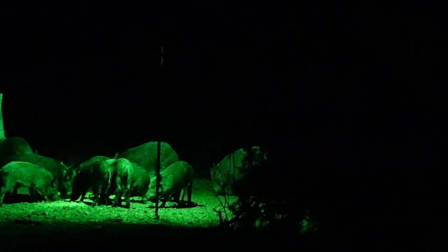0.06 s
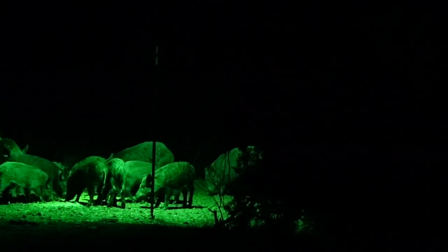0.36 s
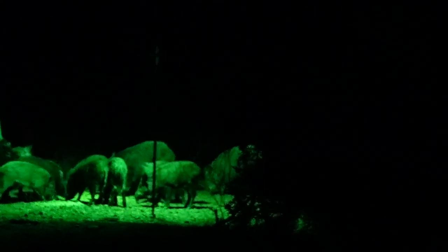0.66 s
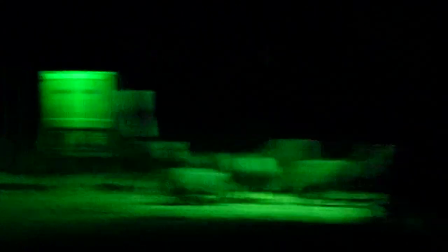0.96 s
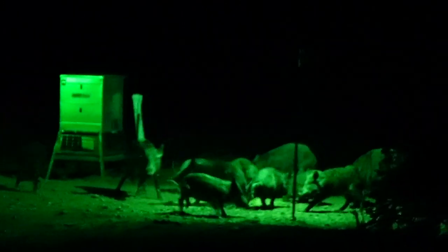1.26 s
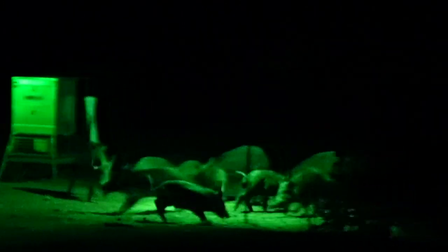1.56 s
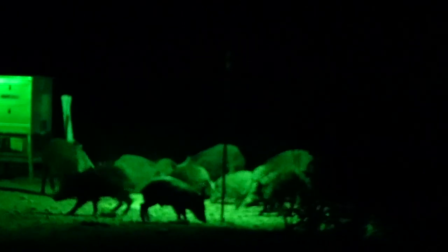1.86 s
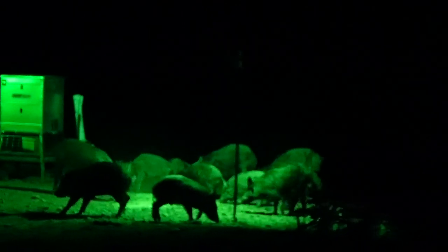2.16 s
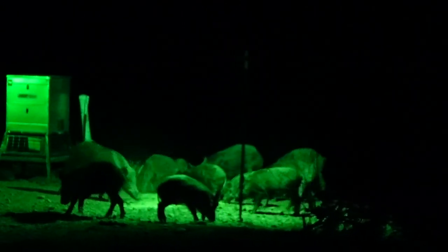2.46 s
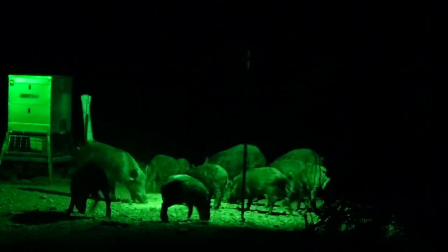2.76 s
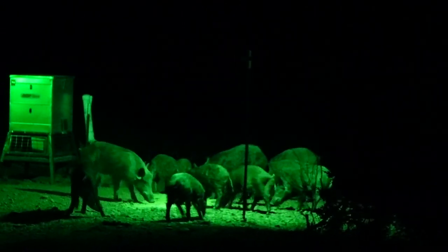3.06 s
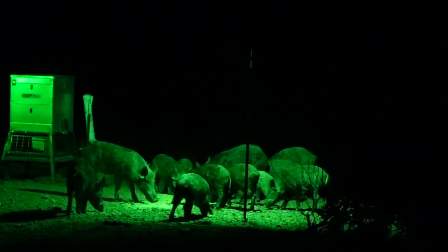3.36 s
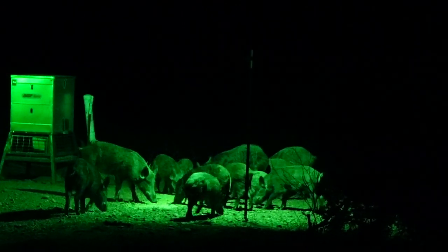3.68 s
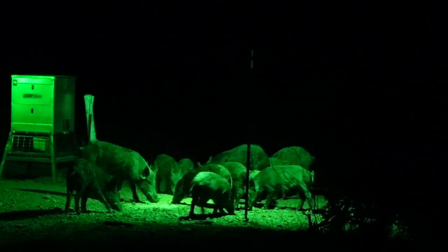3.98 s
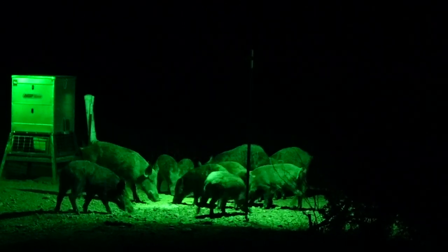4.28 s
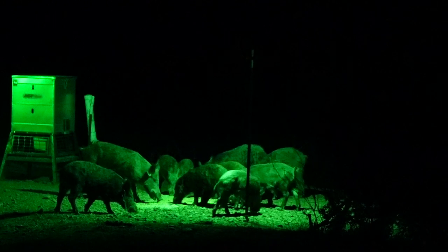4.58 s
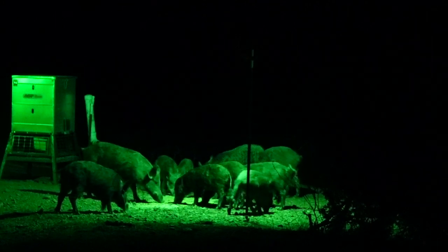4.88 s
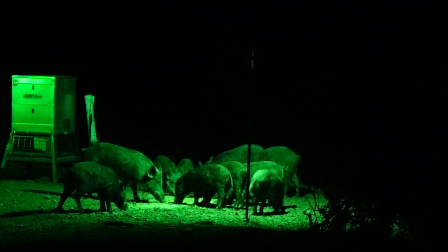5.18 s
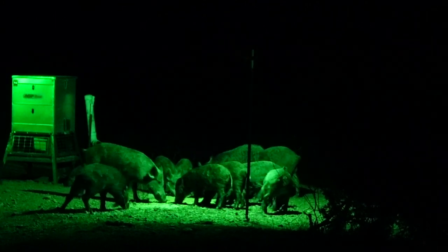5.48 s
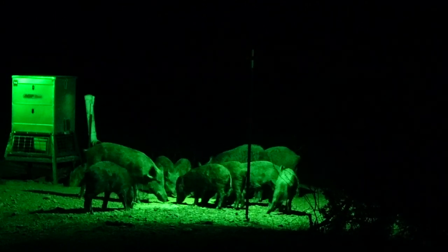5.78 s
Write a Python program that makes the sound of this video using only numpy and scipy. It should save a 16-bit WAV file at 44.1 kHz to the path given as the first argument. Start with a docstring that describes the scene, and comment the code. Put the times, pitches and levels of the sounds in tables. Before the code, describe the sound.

In a clearing at night, wild hogs chew and shuffle over dry ground. One soon lets out a short, strained, raspy squeal that collapses into a grunt, by far the loudest sound. A flurry of crisp snaps and hoof knocks follows, with rubbing cloth and dull thuds on the hand-held microphone. The herd settles into soft crunching, snout scrapes and occasional grunts, while a small bird chirps faintly far away.

```python
"""Feral hogs feeding at night

One hog squeals in quick, harsh pushes, a strained whistle over rattling vocal folds, and ends on a
gruff bark. Jaws crack and smack, snouts root in dry ground, others grunt softly and a far bird chirps.
A hand-held camera swings during the squeal: cloth rustles and the microphone rumbles."""
import sys
import numpy as np
from scipy import signal
from scipy.fft import rfft, irfft
from scipy.io import wavfile
from scipy.ndimage import uniform_filter1d

SR = 44100
rng = np.random.default_rng(int(sys.argv[2]) if len(sys.argv) > 2 else 0)


def dump(signal):
    """Clip the signal to [-1, 1] and save it as 16-bit WAV at the path in sys.argv[1]."""
    limited = np.clip(np.atleast_2d(signal).T, -1, 1)
    pcm = np.round(limited * 32767).astype(np.int16)
    wavfile.write(sys.argv[1], SR, pcm)


N = 257103
TIME = np.arange(N) / SR

# EQ of dry fibres, for both snaps and cloth: f/Hz, level/dB
FIBRE_EQ = [(50, -30), (200, -3), (1000, -6.5), (2000, 2.5), (4000, 1.5), (5500, -1), (6800, -4.5),
            (8400, 1.5), (9700, -11.5), (11000, -11), (13000, -8), (16000, -15.5)]


def squeal():
    """A strained whistle over chaotic fold pulses, which ring the mouth, snout and upper throat."""
    # upper throat resonances that carry the rasp: f/Hz, width/Hz, level/dB
    rasp_formants = [(3085, 140, -5.5), (3780, 300, 3), (4550, 240, -1.5), (5100, 700, -3.8),
                     (5730, 670, -11.5), (7700, 1100, -9.5)]
    moan_top_hz, moan_hz_per_db = 474, 7  # the moan sinks as it weakens
    effort, snout_level, rasp_level, whistle_hz, mouth_hz, rough = pushes()
    snout_db = 20 * np.log10(snout_level / snout_level.max())
    snout_hz = np.maximum(moan_top_hz + moan_hz_per_db * snout_db, moan_top_hz / 2)
    rough = np.clip(rough, .05, .98)
    drive = folds(np.full(N, 255.), jitter=.2, rough=0.87 * rough)
    # the rattling folds shake the whistle in pitch and strength
    shaken_hz = whistle_hz * (1 + 0.0705 * rough * wander(306))
    whistle = unit(sine(shaken_hz) * amp(3.8 * wander(260)))
    mouth = unit(narrow(drive, mouth_hz, 390))
    mouth += amp(-1.5) * unit(narrow(drive, (whistle_hz + mouth_hz) / 2, 1600))
    mouth += amp(-11) * unit(narrow(drive, 1180, 440))  # back of the throat
    # slack folds let broad breath through between the pushes
    puffs = folds(np.full(N, 130.), jitter=0.27, rough=1.0)
    breath = amp(7) * rough ** 4 * unit(resonate(puffs, 1240, 2130))
    voice = steadied(crossfade(whistle, steadied(mouth), rough) + breath)
    # the slow mode of the folds moans in the snout
    moan = sine(snout_hz * (1 + .07 * wander(123.4)))
    snout = steadied(unit(narrow(drive, snout_hz, 250)) + moan)
    # the throat walls flap, so each resonance flutters on its own
    throat = np.zeros(N)
    for hz, width, db in rasp_formants:
        flutter = amp(db + 3.5 * wander(70))
        throat += flutter * unit(resonate(drive, hz * (1 + .022 * wander(35)), width))
    rasp = steadied(unit(throat) + amp(-6.5) * sine(2 * shaken_hz))
    return effort * voice + snout_level * snout + rasp_level * rasp


def pushes():
    """Control curves of the squeal: the pushes add up in power and the strongest leads the voice."""
    # hoarse huffs to strained whistles: t at full force/s, attack/s, hold/s, level/dB, whistle f/Hz,
    # scoop from below/Hz, mouth f/Hz, roughness/0-1, snout level/dB, rasp level/dB
    push_cues = [(0.791, 0.026, 0.009, -30, 1230, 30, 900, 0.92, -38, -52),
                 (0.811, 0.012, 0.001, -22.8, 1185, 20, 1370, 0.06, -41, -29),
                 (0.864, 0.030, 0.005, -16.3, 2040, 490, 1700, 0.46, -32, -37),
                 (0.900, 0.020, 0.004, -28.5, 2040, 20, 1270, 0.88, -36, -33),
                 (0.951, 0.056, 0.013, -12.5, 1865, 25, 1610, 0.35, -34, -40),
                 (0.985, 0.024, 0.020, -15, 1905, 40, 2130, 0.43, -25.5, -28.5),
                 (1.111, 0.044, 0.029, -10.2, 1850, 285, 2240, 0.32, -37.5, -25.5)]
    scoop_lead_s, scoop_s, sag_hz_per_s = 0.01, 0.0045, 1900
    mouth_octaves_per_db, slack_rough = 0.011, 0.93
    columns = np.transpose(push_cues)[:, :, None]
    s, attack, hold, db, top_hz, scoop_hz, open_hz, top_rough, snout_db, rasp_db = columns
    force = swell(s, attack, hold)
    # the whistle leaps up just before full force and sags after it
    scoop = (1 - np.tanh((TIME - s + scoop_lead_s) / (2 * scoop_s))) / 2
    whistle_hz = top_hz - scoop_hz * scoop - np.clip(sag_hz_per_s * (TIME - s), 0, top_hz / 2)
    # as the force eases, the mouth closes and the slack folds rattle more
    mouth_hz = open_hz * 2 ** (mouth_octaves_per_db * force)
    rough = slack_rough + (top_rough - slack_rough) * amp(0.3 * force)
    voice, snout, rasp = amp(db + force), amp(snout_db + 0.72 * force), amp(rasp_db + 0.8 * force)
    levels = [np.linalg.norm(gain, axis=0) for gain in (voice, snout, rasp)]
    timbre = [np.average(each, axis=0, weights=voice ** 2) for each in (whistle_hz, mouth_hz, rough)]
    return levels + timbre


def swell(s, attack, hold):
    """The force of a push in dB re its top: a rounded rise, a hold, a quick drop and a tail."""
    drop_db, drop_s, tail_db_per_s = 7, 0.004, 380
    before, after = np.maximum(s - TIME, 0), np.maximum(TIME - s - hold, 0)
    release_db = drop_db * (1 - np.exp(-after / drop_s)) + tail_db_per_s * after
    return np.maximum(-20 * (before / attack) ** 2 - release_db, -300)


def folds(hz, jitter, rough):
    """Uneven slaps of the vocal folds, each followed by a puff of turbulence."""
    size = len(hz)
    turns = np.cumsum(hz * np.exp(jitter * wander(300, size))) / SR
    slaps = np.diff(np.floor(turns), prepend=0) * amp(1.9 * wander(200, size))
    puffs = (.2 + np.exp(-(turns % 1) / 0.49)) * rng.standard_normal(size)
    return crossfade(unit(slaps), unit(puffs), rough)


def bark():
    """A last push: the whistle collapses into a ragged grunt through the half-closed snout."""
    # the push: t at full force/s, attack/s, hold/s, level/dB, whistle f/Hz, roughness/0-1
    bark_cue = (1.287, 0.019, 0.011, -24.8, 1300, 0.64)
    # throat resonances: f/Hz, width/Hz, level/dB
    formants = [(355, 110, 0), (820, 200, -1.5), (1330, 340, -3), (1600, 250, 0), (2454, 240, -2.5),
                (3200, 640, -5.5), (4150, 410, -9), (5030, 520, -6), (6500, 2300, -11)]
    s, attack, hold, db, hz, rough = bark_cue
    drive = folds(np.full(N, 170.), jitter=0.27, rough=0.85)
    throat = sum(amp(level) * unit(resonate(drive, f, width)) for f, width, level in formants)
    whistle = unit(sine(hz * (1 + 0.032 * wander(240))) * amp(3.6 * wander(200)))
    force = swell(s, attack, hold) * np.where(TIME > s, 0.76, 1)  # slower release than the squeal
    return amp(db + force) * crossfade(whistle, steadied(throat, size=350), rough)


def knocks():
    """Each bite or step is a sharp crack that rings briefly and crumbles away."""
    # jaw cracks and hoof knocks: t/s, peak level/dB, ring f/Hz
    hits = [(0.063, -30, 2770), (0.179, -23.5, 820), (0.201, -24.5, 980), (0.627, -21.5, 620),
            (2.1495, -20.5, 710), (2.726, -32, 2220), (2.7568, -21.5, 2130), (2.7705, -25.5, 2200),
            (2.7795, -31, 2240), (2.934, -30, 2000), (4.677, -29.5, 860), (4.68, -34, 1600),
            (4.849, -30.5, 1288), (4.888, -31, 1880), (5.589, -30.5, 1430)]
    ring_t60_s = 0.025
    out, t = np.zeros(N), np.arange(4096) / SR
    for s, db, hz in hits:
        crumble = 0.055 * rng.standard_normal(len(t)) * amp(-60 * t / (1.45 * ring_t60_s))
        crack = resonate((t == 0) + crumble, hz, 810)
        ring = np.sin(2 * np.pi * hz * t) * amp(-60 * t / ring_t60_s) * (1 - np.exp(-t * hz))
        sound = crack / abs(crack).max() + 0.4 * ring
        add(out, s, amp(db) * sound / abs(sound).max())
    return out


def snaps():
    """Dry fibres strain and give way: a tick inside a short crunch, each with its own ring."""
    # snaps and scuffs: t/s, peak level/dB, time to fall 30 dB/s, tilt/(dB per octave)
    hits = [(0.065, -30.5, .06, 0), (0.252, -26.5, .005, -4.5), (0.313, -31.5, .018, -2),
            (0.344, -32, .008, 2), (1.380, -26, .006, 6), (1.457, -26.5, .01, 0), (1.548, -25, .07, 1),
            (1.616, -26.5, .06, 6), (1.662, -24, .06, -4.5), (1.735, -26, .008, -4.5), (1.785, -22, .04, 0),
            (1.912, -27.5, .007, -5), (1.918, -27, .014, 2), (1.973, -26.5, .04, -0.5),
            (2.164, -22.5, .016, -3), (2.2, -24, .007, -1.5), (2.209, -29.5, .03, -2),
            (2.231, -29, .004, -5), (2.289, -32, .01, -3), (2.510, -29, .012, -6), (2.524, -29, .03, -4.5),
            (2.850, -31.5, .009, 6), (3.193, -30, .012, -4), (4.227, -29.5, .04, 1), (4.289, -25, .008, 0),
            (4.849, -32.5, .012, 4)]
    # smaller snaps from the hooves of the startled hogs
    start_s, end_s, grit_per_s = 1.35, 2.45, 22
    chances = rng.random((round((end_s - start_s) * grit_per_s), 2))
    grit = [(start_s + (k + late) / grit_per_s, -35.5 + 5 * (size - .5), 0.016, -4)
            for k, (late, size) in enumerate(chances)]
    out, t = np.zeros(N), np.arange(-512, 7680) / SR
    strain, tick = 0.26 * np.exp(-abs(t) / 0.0017), 0.96 * np.exp(-abs(t) / 0.00078)
    for s, db, length, tilt_db in hits + grit:
        burst = rng.standard_normal(len(t)) * amp(3 * rng.standard_normal(len(t)))
        envelope = np.where(t < 0, strain, amp(-30 * abs(t) / length) + tick)
        ring_eq = np.column_stack([np.geomspace(800, 16000, 14), 2.5 * rng.standard_normal(14)])
        sound = colour(colour(burst * envelope, FIBRE_EQ, tilt_db), ring_eq)
        add(out, s + t[0], amp(db) * sound / abs(sound).max())
    return out


def grunts():
    """Slow, ragged fold pulses in a long snout, with breath through the nostrils."""
    # low grunts and snorts: t/s, length/s, level/dB, throat f/Hz, breath re throat/dB
    grunt_cues = [(0.565, 0.11, -38, 620, -3.5), (3.21, 0.051, -46.5, 353, -1.5),
                  (3.476, 0.03, -44.5, 420, -18.5), (3.982, 0.054, -48, 370, -14),
                  (4.19, 0.26, -49, 497, -9), (4.565, 0.11, -48, 256, -5.5),
                  (5.003, 0.062, -48.5, 473, -0.5), (5.63, 0.14, -48, 830, -12)]
    out = np.zeros(N)
    for s, length, db, hz, breath_db in grunt_cues:
        size = int(length * SR)
        drive = folds(np.full(size, 75.), jitter=0.13, rough=1.0)
        throat = unit(resonate(drive, hz, width=hz * (0.51 + 1.2 * amp(breath_db))))
        breath = amp(breath_db) * unit(resonate(drive, 1730, 1500))
        add(out, s, amp(db) * unit(throat + breath) * np.hanning(size) ** 0.62)
    return out


def rooting():
    """A snout shoves loose dirt: a short, grainy scrape."""
    # shoves: t/s, length/s, level/dB, centre f/Hz
    scrapes = [(0.44, 0.034, -52.5, 1680), (2.56, 0.09, -47.5, 1970), (2.951, 0.076, -45.5, 1950),
               (3.1, 0.1, -55, 2190), (3.45, 0.05, -46.5, 1380), (3.621, 0.086, -48.5, 1650),
               (4.572, 0.048, -50, 2100), (5.58, 0.14, -49, 1470)]
    out = np.zeros(N)
    for s, length, db, hz in scrapes:
        size = int(length * SR)
        grit = rng.standard_normal(size) * amp(5 * wander(130, size))
        add(out, s, amp(db) * unit(resonate(grit, hz, 1160)) * np.hanning(size) ** 0.97)
    return out


def herd():
    """A bed of many snouts and hooves: a soft wash, little smacks and crisp straw."""
    # how busily the herd shuffles: t/s, level/dB
    activity = [(0.0, -49.7), (0.5, -53.3), (1.5, -46.5), (1.85, -52), (2.47, -52.3), (2.55, -50.3),
                (3.1, -50.2), (3.45, -51), (3.95, -49.4), (4.32, -46.3), (4.7, -49.7), (5.83, -49.7)]
    # EQ of the shuffling: f/Hz, level/dB
    wash_eq = [(40, -4.5), (120, -3), (250, -1), (450, -0.5), (900, -1.5), (1400, -0.5), (2200, -7),
               (3200, -12), (6000, -25.5), (16000, -36)]
    # EQ of the straw: f/Hz, level/dB
    straw_eq = [(500, -29), (2000, -6.5), (3500, -0.3), (5000, -1.9), (6800, -3), (8500, -2.8), (9800, -8),
                (13000, -10.3), (16000, -14.5)]
    busy_db = curve(activity)
    wash = unit(colour(rng.standard_normal(N), wash_eq))
    smacks = patter(per_s=14, pitches_hz=np.geomspace(380, 2400, 8), width_share=0.37)
    shuffle = amp(busy_db) * (amp(-0.5) * wash + amp(-5.3) * smacks)
    hiss = rng.standard_normal(N)
    ticks = patter(per_s=30, pitches_hz=np.geomspace(2600, 12000, 5), width_share=0.56)
    stalks = hiss + 0.38 * ticks * amp(3.2 * wander(38))
    straw_db = -53.3 + 1.35 * (busy_db - np.median(busy_db))
    straw = unit(colour(stalks, straw_eq)) * amp(straw_db) * np.interp(TIME, [2.1, 2.5], [.3, 1])
    return (shuffle + straw) * amp(0.8 * wander(24))  # the feeding comes in uneven clumps


def patter(per_s, pitches_hz, width_share):
    """Small ticks that ring briefly, about per_s a second at each pitch."""
    out = np.zeros(N)
    for hz in pitches_hz:
        ticks = (rng.random(N) < per_s / SR) * rng.uniform(-1.24, 1, N)
        out += unit(resonate(ticks, hz, width_share * hz))
    return unit(out)


def bumps():
    """Fingers thud dully on the camera."""
    # soft bumps on its body: t/s, level/dB, ring f/Hz, t60/s
    thuds = [(0.36, -30.5, 45.4, 0.27), (0.41, -37, 168, 0.12), (0.727, -25.5, 59.6, 0.15),
             (0.732, -24.5, 156, .07), (2.15, -32, 160, 0.116), (2.149, -25, 400, 0.05),
             (2.321, -32, 163.3, .12), (2.325, -35.5, 68, 0.27)]
    out, t = np.zeros(N), np.arange(SR // 3) / SR
    attack = 1 - np.exp(-t / 0.0062)
    for s, db, hz, t60 in thuds:
        add(out, s, amp(db - 60 * t / t60) * np.sin(2 * np.pi * hz * t) * attack)
    return out


def handling():
    """Cloth rubs in clumps of tiny slips while the camera swings; its body rumbles, then settles."""
    # cloth rubbing, ahead of its fade-out: t/s, level/dB
    rubbing = [(0.0, -50.5), (0.55, -56.5), (0.93, -41.5), (1.68, -47.5), (1.92, -55), (2.4, -51),
               (2.5, -63.5)]
    # EQ of the body's rumble: f/Hz, level/dB
    rumble_eq = [(3, -45.5), (12, 5.5), (24, -9.5), (38, -11.5), (70, -22), (110, -29.5), (200, -29.5),
                 (500, -81.5)]
    swing_db, rest_db, swing_end_s, settle_db_per_s = -40.3, -70, 2.33, 36
    slips = (rng.standard_normal(N) + 1.1 * crackle(per_s=1300, spread_db=3.4)) * amp(2.6 * wander(55))
    cloth = unit(colour(slips, FIBRE_EQ)) * amp(curve(rubbing)) * np.interp(TIME, [2.0, 2.6], [1, 0])
    rumble_db = np.maximum(swing_db - settle_db_per_s * np.maximum(TIME - swing_end_s, 0), rest_db)
    return cloth + unit(colour(rng.standard_normal(N), rumble_eq)) * amp(rumble_db)


def crackle(per_s, spread_db):
    """Sparse clicks, mostly small and a few large."""
    clicks = (rng.random(N) < per_s / SR) * rng.standard_normal(N)
    return unit(clicks * amp(spread_db * np.minimum(rng.exponential(1, N), 3.5)))


def chirps():
    """A small far bird: short runs of a thin, falling note, never quite at the same pitch."""
    # phrases: t/s, notes, note spacing/s, level/dB
    phrases = [(3.2, 2, 0.058, -53), (3.449, 2, 0.058, -52), (4.912, 3, 0.029, -52),
               (5.277, 4, 0.028, -52.5), (5.663, 2, 0.06, -55)]
    top_hz, step_hz, note_s, fall_hz_per_s = 4290, 75, 0.036, 12000
    out, t = np.zeros(N), np.arange(int(note_s * SR)) / SR
    for s, notes, gap, db in phrases:
        for k in range(round(notes)):
            start_hz = top_hz - k * step_hz + 55 * rng.standard_normal()
            slur_hz = start_hz - fall_hz_per_s * t + 25 * wander(150, len(t))
            add(out, s + k * gap, amp(db) * sine(slur_hz) * np.hanning(len(t)))
    return out


def clearing(x, wet_db, t60):
    """Brush and trees around the clearing scatter a thin, dull tail."""
    t = np.arange(SR) / SR
    taps = (rng.random(SR) < 2000 / SR) * rng.choice([-1., 1.], SR)
    decay = amp(-60 * t / t60) * (t > .012)
    tail = signal.lfilter(*signal.butter(1, 4500, fs=SR), taps * decay)
    return x + amp(wet_db) * signal.fftconvolve(x, tail / np.linalg.norm(tail))[:N]


def amp(db):
    """Decibels to gain."""
    return 10 ** (np.asarray(db) / 20)


def unit(x):
    """Scales to rms 1."""
    return x / np.sqrt(np.mean(x ** 2) + 1e-20)


def curve(rows):
    """A (t/s, value) table at every sample."""
    return np.interp(TIME, *np.transpose(rows))


def add(mix, s, sound):
    """Mixes a sound in at s seconds."""
    part = mix[max(round(s * SR), 0):][:len(sound)]
    part += sound[:len(part)]


def sine(hz):
    """A tone that follows the curve hz."""
    return np.sin(2 * np.pi * np.cumsum(hz) / SR)


def crossfade(a, b, share):
    """Equal-power blend from a (share 0) to b (share 1)."""
    return np.sqrt(1 - share) * a + np.sqrt(share) * b


def colour(x, eq, tilt_db=0):
    """Filters by an (f/Hz, level/dB) curve, tilted in dB per octave above about 1 kHz."""
    octave = np.log2(np.fft.rfftfreq(len(x), 1 / SR) + 1)
    hz, db = np.transpose(eq)
    gain_db = np.interp(octave, np.log2(hz), db) + tilt_db * np.clip(octave - 10, 0, None)
    return irfft(rfft(x) * amp(gain_db), len(x))


def wander(rate_hz, size=N):
    """Smooth random modulation of rms 1, rolling off at the given rate."""
    hz = np.fft.rfftfreq(size, 1 / SR)
    return unit(irfft(rfft(rng.standard_normal(size)) * np.exp(-(hz / rate_hz) ** 2), size))


def resonate(x, hz, width):
    """A steep resonance that follows the curve hz; width in Hz."""
    turn = np.exp(2j * np.pi * np.cumsum(hz * np.ones(len(x))) / SR)
    r = np.exp(-np.pi * width / SR)
    return 2 * (turn * signal.lfilter([(1 - r) ** 2], [1, -2 * r, r * r], x / turn)).real


def narrow(x, hz, width):
    """A resonance passed twice, for steeper flanks."""
    return resonate(resonate(x, hz, width), hz, width)


def steadied(x, size=500):
    """Holds the short-time level at 1 and leaves the fast flutter."""
    return x / np.sqrt(abs(uniform_filter1d(x ** 2, size)) + 1e-12)


def scene():
    """The animals in the clearing, the far bird and the noises at the camera, in mono."""
    hogs = clearing(squeal() + bark() + grunts() + knocks() + rooting(), wet_db=-27, t60=0.32)
    bird = clearing(chirps(), wet_db=-22, t60=0.3)
    return (hogs + bird + herd() + snaps() + bumps() + handling())[None]


def record(dry):
    """Soft saturation rounds the highest peaks; a steep low-pass trims the top."""
    rounded = 1.3 * np.tanh(dry / 1.3)
    lowpass = signal.firwin(2047, cutoff=15850, window=("kaiser", 9), fs=SR)
    return signal.oaconvolve(rounded, lowpass[None], "same")


dry = scene()
out = record(dry)
dump(out)
```